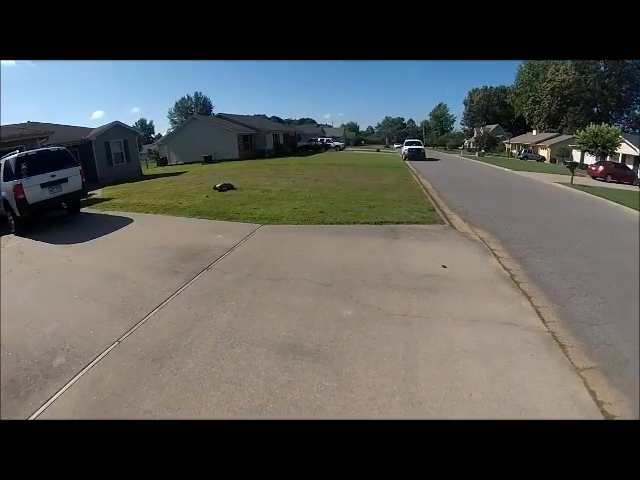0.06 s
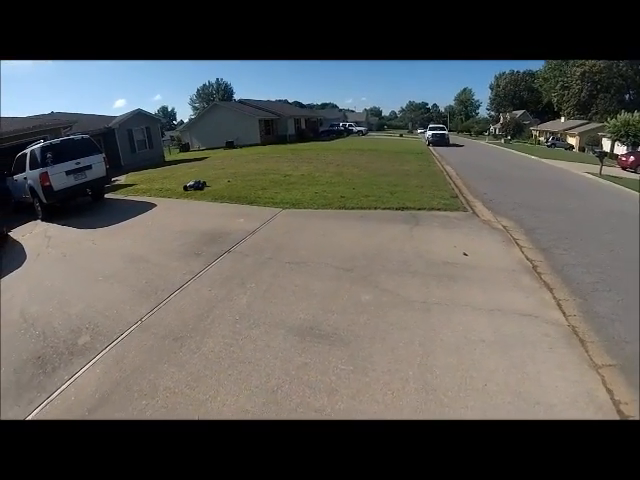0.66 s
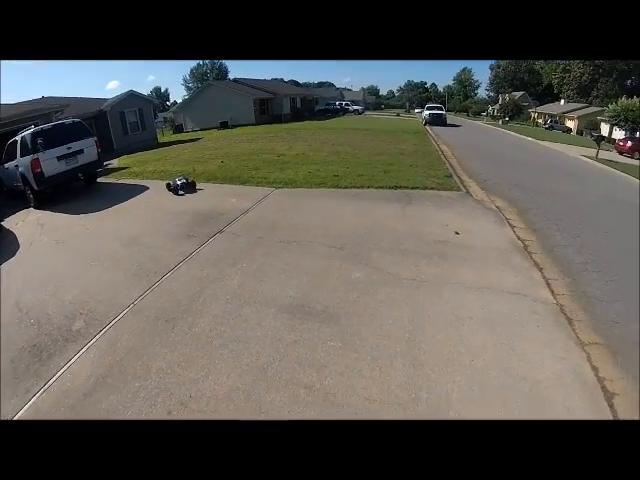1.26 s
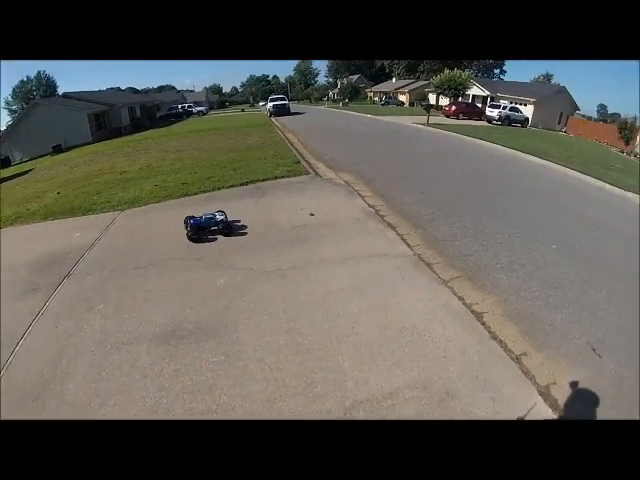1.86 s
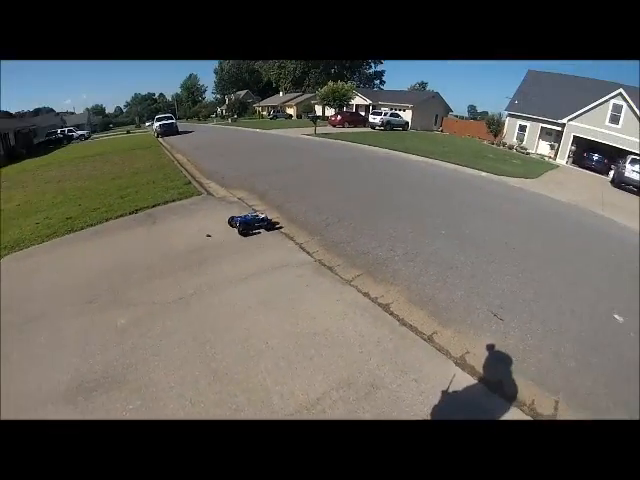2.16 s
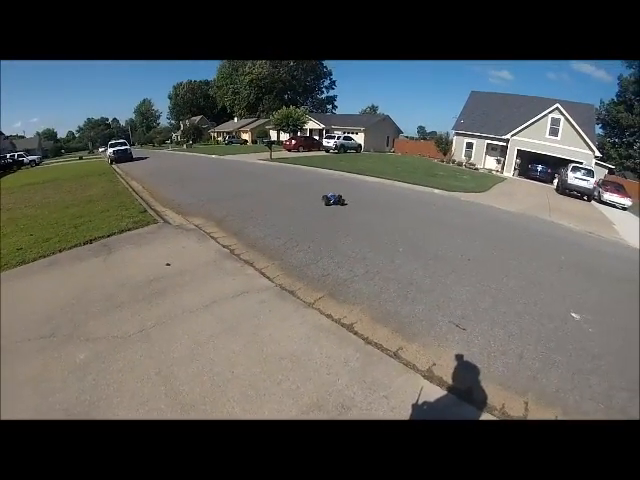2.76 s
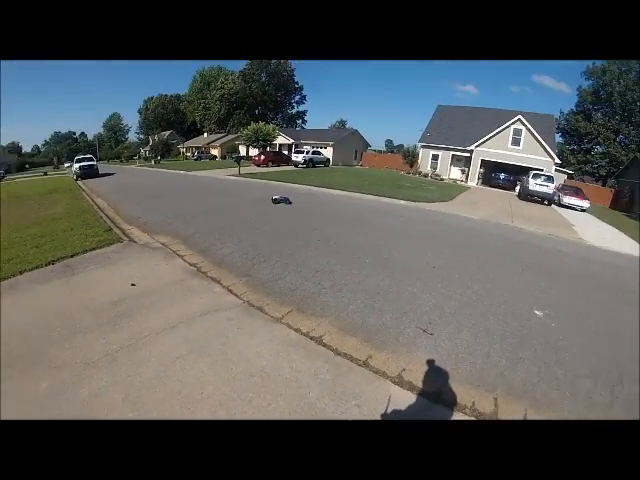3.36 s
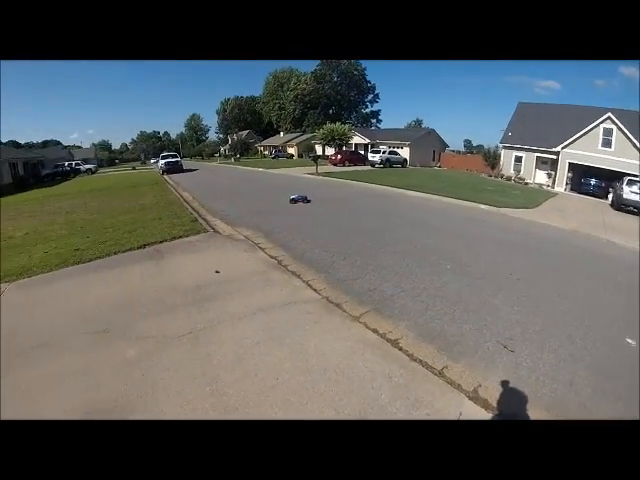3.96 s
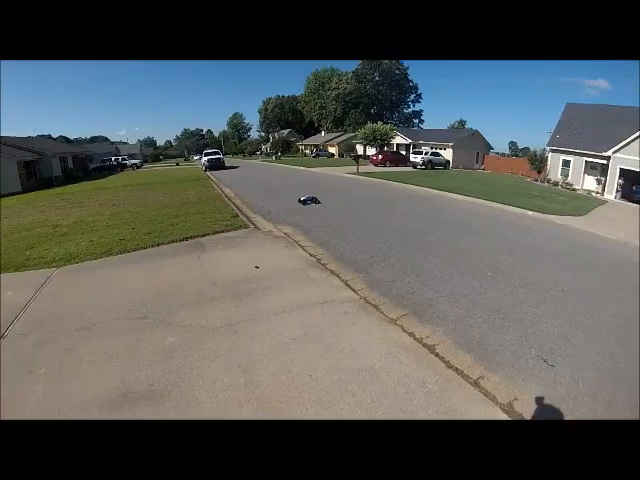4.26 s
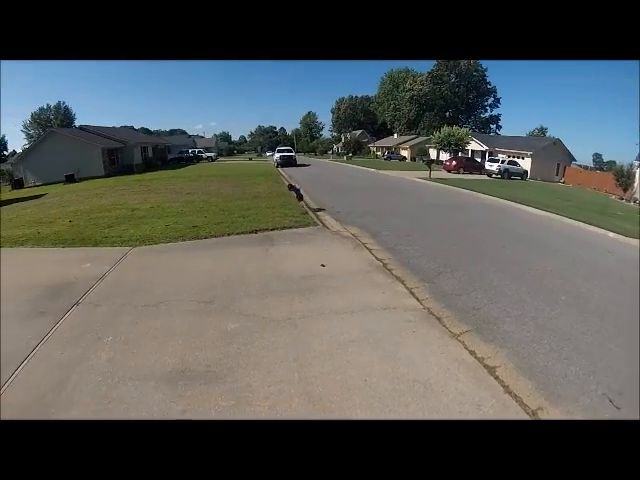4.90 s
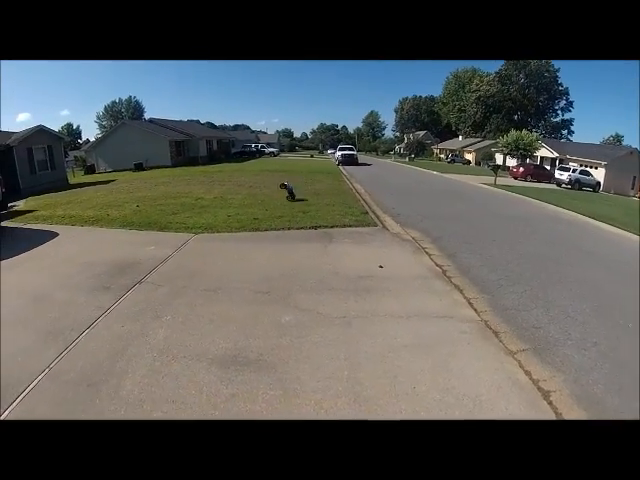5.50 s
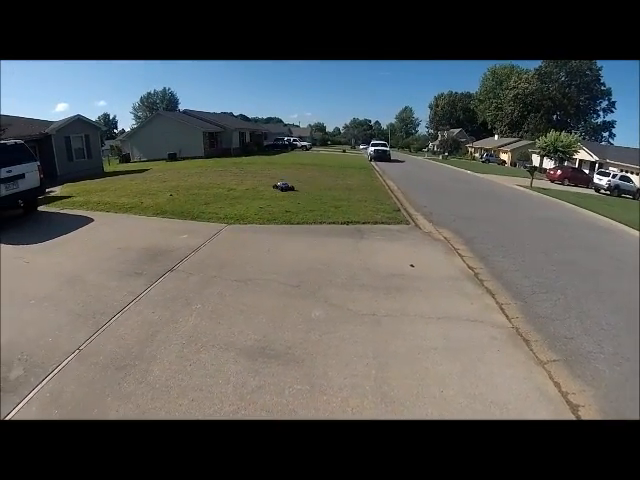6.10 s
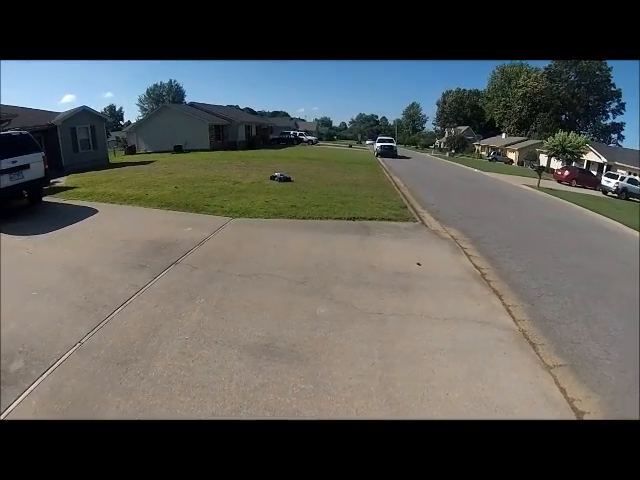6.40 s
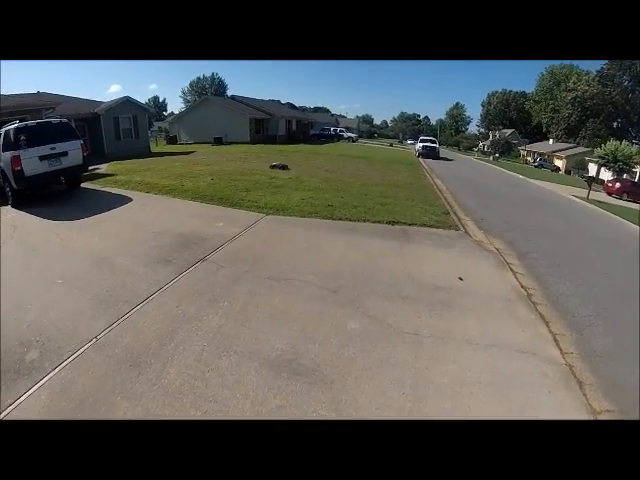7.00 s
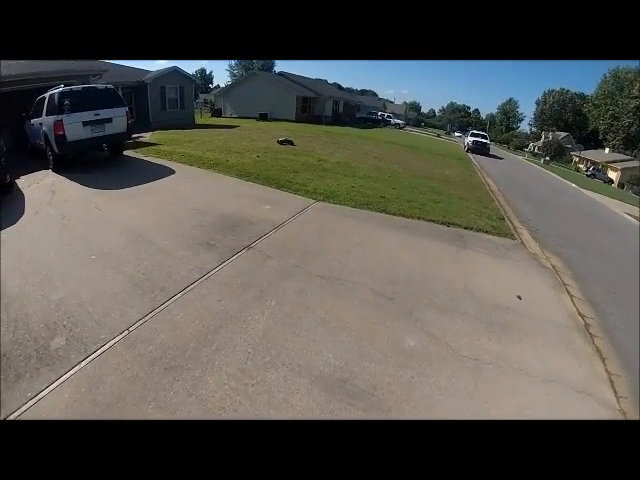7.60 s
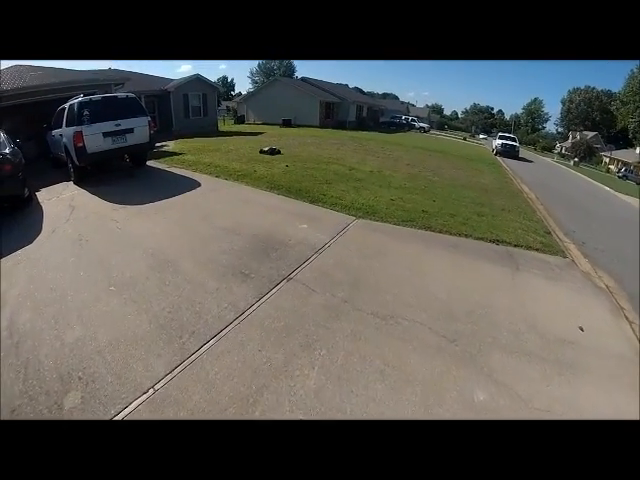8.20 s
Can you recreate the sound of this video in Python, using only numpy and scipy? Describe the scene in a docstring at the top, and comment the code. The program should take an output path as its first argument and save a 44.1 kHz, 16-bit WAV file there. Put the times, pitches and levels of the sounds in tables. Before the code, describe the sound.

Wind rumbles on the microphone as a toy truck's gears whine by, its tyres rush, and it knocks, tumbles and drives on.

```python
"""Wind buffets the microphone on a quiet suburban street while an electric toy truck whines off a lawn,
ten metres away. It speeds over concrete, passes at just over three metres, turns in the street, hits the
kerb, flies, tumbles and labours on through grass, out to seventeen metres. Its meshing gears sing
through the plastic shell, its tyres rush and drum, and the house fronts return a faint echo."""
import sys
import numpy as np
from scipy import signal
from scipy.fft import rfft, irfft, next_fast_len
from scipy.io import wavfile
from scipy.ndimage import uniform_filter1d, map_coordinates

SR = 44100
rng = np.random.default_rng(int(sys.argv[2]) if len(sys.argv) > 2 else 0)


def wrap_up_sound(samples):
    """Save the sound to the file named by the first command line argument, as 16-bit audio."""
    columns = np.atleast_2d(samples).T
    # keep every value between -1 and 1, then stretch to whole-number steps
    tamed = np.clip(columns, -1, 1)
    steps = np.round(tamed * 32767).astype(np.int16)
    wavfile.write(sys.argv[1], SR, steps)


N = 363825
TOP_HZ = 15000

# Loose shafts and shell, shaken by throttle or blows. Each row: frequency in Hz, density in dB.
LOOSE_PARTS = [(590, -24), (1000, -1), (1350, 4), (1860, -9), (2300, -1.5), (2700, -2), (3350, -6),
               (3870, -10.5), (4500, -8), (5000, -12), (5600, -1), (6500, -8.5), (7380, -15), (8100, -14.5),
               (8800, -26), (11300, -20), (12700, -21), (14000, -60)]
# Under the wheels. Each gives rolling, drumming and grit in dB, then depth of turf from 0 to 1.
LAWN = (-52, -82, -65, 1)
CONCRETE = (-41, -44.5, -54.5, 0)
ASPHALT = (-47.5, -50, -76.5, 0.5)
AIR = (-50.5, -79, -79, 0)


def amp(db):
    """Decibels to gain."""
    return 10 ** (np.asarray(db) / 20)


def unit(x):
    """Scale to rms 1."""
    return x / np.sqrt(np.mean(x ** 2) + 1e-20)


def wobble(rate):
    """A smooth random curve, rate knots a second."""
    knots = rng.standard_normal(int(N * rate / SR) + 4)
    return map_coordinates(knots, [np.arange(N) * rate / SR])


def filtered(x, response):
    """x through a complex response of frequency."""
    size = next_fast_len(N + SR // 2)
    return irfft(rfft(x, size) * response(np.fft.rfftfreq(size, 1 / SR)), size)[:N]


def coloured(x, spectrum):
    """x through (Hz, dB) points joined on a log frequency axis."""
    points_hz, db = np.transpose(spectrum)
    return filtered(x, lambda hz: amp(np.interp(np.log(hz + 1), np.log(points_hz + 1), db)))


def noise(spectrum):
    """Coloured noise of rms 1."""
    return unit(coloured(rng.standard_normal(N), spectrum))


def envelope(start, length, attack, release):
    """Rises, holds and dies away; times in seconds."""
    t = np.maximum(np.arange(N) / SR - start, 0)
    return (1 - np.exp(-t / attack)) * np.exp(-np.maximum(t - length, 0) / release)


def swells(rows, rise_share, release_s):
    """One gain curve for each dB column of (start, length, dB, ..) events; their powers add."""
    power = sum(np.outer(amp(dbs), envelope(start, length, rise_share * length, release_s)) ** 2
                for start, length, *dbs in rows)
    return np.sqrt(power)


def street(level_db=-66):
    """Distant traffic lays a steady bed under the suburb."""
    # Each row: frequency in Hz, density in dB.
    traffic = [(59, -14), (100, 2), (149, -10), (222, -6.5), (556, -15), (1020, -12), (1370, -23),
               (1760, -23), (2360, -30), (3510, -27.5), (3900, -34.5), (5680, -27.5), (7300, -35),
               (12100, -41.5), (14900, -62)]
    return amp(level_db) * noise(traffic)


def wind(breeze_db=-64.5):
    """Slow eddies push on the microphone; faster air roars round its housing."""
    # Each row: start in seconds, length in seconds, buffeting in dB, roar in dB.
    gusts = [(0, 0.18, -44.5, -45), (1.04, 0.93, -39.5, -42), (.19, .67, -37, -38), (.49, 0.14, -37, -37),
             (.9, 0.16, -33, -38.5), (1.77, 0.25, -39, -67), (1.98, 0.22, -46, -57),
             (2.28, 0.12, -50.5, -77), (3.45, 0.45, -49.5, -81), (4.5, 0.39, -54, -73),
             (4.91, 0.22, -43.5, -63.5), (5.2, 0.12, -40, -60), (5.35, 0.29, -53, -92),
             (5.7, 0.13, -45, -54), (5.86, 0.1, -38.5, -57), (6.08, 0.059, -48.5, -67),
             (6.21, 0.1, -44.5, -62), (6.35, 0.24, -56, -66.5), (7.31, 0.075, -54, -83),
             (7.792, 0.026, -37.5, -55.5), (7.95, 0.073, -38, -56.5), (8.05, 0.17, -45.5, -58)]
    # The eddies. Each row: frequency in Hz, density in dB.
    rumble_spectrum = [(11, -49), (18, 4.5), (46, -2), (140, -11), (350, -31), (460, -40), (770, -120)]
    # Air round the housing. Each row: frequency in Hz, density in dB.
    roar_spectrum = [(60, -3), (120, -2.5), (200, 0), (300, -1), (400, -5.5), (550, -11), (800, -16.5),
                     (1050, -24.5), (1400, -34), (3000, -53), (6000, -120)]
    buffet, flow = swells(gusts, rise_share=0.014, release_s=0.042)
    rumble = unit(noise(rumble_spectrum) * amp(3 * wobble(30)))
    roar = unit(noise(roar_spectrum) * amp(1.2 * wobble(60)))
    return np.hypot(buffet, amp(breeze_db)) * rumble + flow * roar


def house_echo(x, level_db=-17, t60=0.25, delay_s=0.024):
    """House fronts scatter a faint, late echo back to the microphone."""
    t = np.arange(SR // 2) / SR
    tail = rng.standard_normal(len(t)) * amp(-60 * t / t60) * (t > delay_s)
    return amp(level_db) * signal.fftconvolve(x, tail / np.linalg.norm(tail))[:N]


def controller(switch_hz=8113):
    """Chopped motor current makes the windings whistle faintly."""
    # Spells at part throttle. Each row: start in seconds, end in seconds, level in dB.
    spells = [(6.27, 6.66, -88), (6.76, 6.9, -94), (7.57, 7.9, -87), (7.9, 8.25, -91)]
    t = np.arange(N) / SR
    gate = sum(amp(db) * ((t > start) & (t < end)) for start, end, db in spells)
    whistle = unit(amp(2.7 * wobble(80)) * np.sin(2 * np.pi * switch_hz * t))
    return uniform_filter1d(gate, size=1800) * whistle


def knocks(contact_s=0.002, thud_db=-7, clack_db=-9, thud_t60=0.063, clack_t60=0.059):
    """Each blow on a joint, kerb or turf shakes the chassis and makes the loose shell clatter."""
    # Each row: start in seconds, level in dB, thud offset in dB, clack offset in dB.
    blows = [(0.56, -35, 3, -32), (0.807, -40, 2, -25), (0.95, -43, -7, -28), (1.276, -42, -14, -2),
             (1.937, -24.5, -2, -11), (1.963, -33, 3, -27), (2.016, -31.5, -4.5, -7), (2.303, -37, -2, -24),
             (2.333, -51, -12, -5), (2.358, -48, -12, -5), (2.44, -52, -7, -10), (3.062, -43, 0, -25),
             (3.103, -43, 2, -25), (4.919, -32, -2, -14), (4.94, -41, -8, -24), (4.973, -35, -5, -22),
             (4.994, -31.5, -1, -5), (5.049, -42, -17, -1.5), (5.086, -44.5, -20, 2),
             (5.131, -44.5, -23, -1), (5.157, -43, -26, 0.5), (5.244, -46, -16, -2), (5.28, -45, -23, 0),
             (5.349, -48, -20, -3), (5.378, -47, -6, -1), (5.412, -48.5, -16, -2.5),
             (5.517, -49.5, -18, -1.5), (5.645, -51, -20, 0), (5.686, -47, -1, 0), (5.702, -35, -1, -9),
             (5.724, -43.5, 3, -10), (5.759, -51, -6, -0.5), (7.02, -49, 1, -1), (7.167, -50.5, -13, -2),
             (7.318, -53, -4, -8), (7.595, -49.5, -8, -5.5), (7.63, -55.5, -10, 0)]
    # Chassis resonances. Each row: frequency in Hz, width in Hz, gain in dB.
    modes = [(628, 82, 10.5), (1110, 390, 0.5), (1556, 4.5, 8)]

    def chassis(hz):
        """The resonances add with alternating signs."""
        return sum((-1) ** k * amp(db) * 1j * hz * width / (centre ** 2 - hz ** 2 + 1j * hz * width)
                   for k, (centre, width, db) in enumerate(modes))

    t = np.arange(SR // 3) / SR
    thud_gain, clack_gain = np.zeros((2, N + SR))
    give = 1 - np.exp(-t / contact_s)  # rubber and turf yield
    for start, db, thud_offset, clack_offset in blows:
        first = round(start * SR)
        thud_gain[first:first + len(t)] += give * amp(db + thud_offset - 60 * t / thud_t60)
        clack_gain[first:first + len(t)] += give * amp(db + clack_offset - 60 * t / clack_t60)
    thud = thud_gain[:N] * unit(filtered(rng.standard_normal(N), chassis))
    clack = clack_gain[:N] * noise(LOOSE_PARTS)
    return amp(thud_db) * thud + amp(clack_db) * clack


def ground(crossing_s=0.2):
    """The wheels cross from surface to surface: curves of rolling, drumming and grit dB, and turf."""
    # Each row: time of crossing in seconds, surface.
    route = [(0, LAWN), (1.22, CONCRETE), (2.05, ASPHALT), (5.03, AIR), (5.7, LAWN)]
    t = np.arange(N) / SR
    under = np.outer(route[0][1], np.ones(N))
    for (_, old), (when, new) in zip(route, route[1:]):
        crossed = np.clip((t - when) / crossing_s + .5, 0, 1)
        under += np.outer(np.subtract(new, old), crossed)
    return under


def tyres(ground_db, octaves, spin):
    """Treads patter, drum on the hollow tyres and throw grit: more with speed, skids and wheelspin."""
    # Each row: start and length in seconds, then rolling, drumming and grit in dB.
    skids = [(1.55, 0.2, -35.5, -36.5, -74), (1.76, 0.14, -31.5, -60, -36.5), (2.56, 0.62, -42, -34.5, -84),
             (3.1, 0.53, -39.5, -37.5, -81), (3.46, 0.41, -51, -67, -57.5), (4.13, 0.27, -47.5, -46.5, -87),
             (6.42, 0.15, -45.5, -73, -73), (4.79, 0.2, -45, -61, -53), (4.9, 0.081, -29.5, -33.5, -67)]
    # Tread blocks on the ground. Each row: frequency in Hz, density in dB.
    tread = [(180, -27), (300, -8.5), (716, 0), (775, -1), (1010, -0.5), (1180, -9), (1750, -5),
             (2300, -20), (2700, -14.5), (3400, -15.5), (3900, -24.5), (4500, -20.5), (5670, -27.5),
             (7000, -34), (9100, -59), (15400, -120)]
    # The hollow tyres. Each row: frequency in Hz, density in dB.
    carcass = [(71, -46), (120, -22), (193, -5), (236, -4.5), (270, -2.5), (360, 1.5), (725, -8.5),
               (873, -11.5), (1160, -19), (1400, -44), (1820, -50), (3080, -120)]
    # Flying grit. Each row: frequency in Hz, density in dB.
    spray = [(4120, -9), (6000, -1), (6800, -18), (8000, -12), (8800, -8.5), (9800, -2.5), (10400, -6),
             (11200, -5), (12200, -11), (14900, -32)]
    roll_db, drum_db, grit_db = ground_db
    skid_roll, skid_drum, skid_grit = swells(skids, rise_share=0.063, release_s=0.032)
    roll_gain = amp(-1.5) * np.hypot(amp(roll_db + 4 * octaves + 6 * spin), skid_roll)
    drum_gain = np.hypot(amp(drum_db + 4 * octaves), skid_drum)
    grit_gain = amp(-2) * np.hypot(amp(grit_db + 8 * octaves + 9 * spin), skid_grit)
    bumps = amp(1.5 * wobble(70))
    roll = roll_gain * unit(bumps * noise(tread))
    drum = drum_gain * unit(bumps * noise(carcass))
    grains = amp(2 * wobble(790))
    grit = grit_gain * unit(bumps * grains * noise(spray))
    return roll + drum + grit


def coasting(octaves, pull, turf, level_db=-57):
    """Slack gears clatter in the hollow shell: most when rolling fast and unloaded on hard ground."""
    # The shell's ring. Each row: frequency in Hz, density in dB.
    hollow_shell = [(1000, -20), (1700, -3), (2350, -14), (2720, 0), (3050, -5), (3420, 3), (3880, -13),
                    (4450, -3), (4950, -6), (5500, 0), (5900, -5), (6400, -19), (8400, -21), (9900, -9),
                    (10700, -13), (11300, -12), (13500, -36)]
    clatter = amp(2.8 * wobble(110) + 2.2 * wobble(500))
    gain = amp(level_db + 4 * octaves - 3 * pull - 4 * turf)
    return gain * unit(clatter * noise(hollow_shell))


def rattle(gain, trim_db=-1):
    """Loose shafts and the shell buzz under throttle."""
    shake = amp(2.6 * wobble(240) + 1.3 * wobble(45))
    return amp(trim_db) * gain * unit(shake * noise(LOOSE_PARTS))


def motor(idle_hz=1300, attack_s=.005, release_s=.018, rattle_release_s=0.13):
    """Each squeeze of the throttle ramps the speed and loads the gears, then the truck coasts down."""
    # Each row: start and end in seconds, pinion mesh from and to in Hz, run-down time constant in
    # seconds, final whine in dB, swell in dB, rattle in dB, roughness, and the strain that brings out
    # the overtones in dB per multiple of the mesh.
    squeezes = [ (0, .55, 2030, 1960, 1.9, -60, -1, -56, 1.6, 6),
                (.55, 1.12, 1790, 2000, 1.9, -47, 3, -54, .9, 1.3),
                (1.125, 1.235, 1990, 1930, 1.9, -40.5, 3, -51, 1.1, -1.5),
                (1.24, 1.33, 2200, 2420, 1.9, -45.5, 0, -49, 1.1, 1),
                (1.335, 1.49, 2600, 3480, .9, -44.5, -3, -46, 1, 1.5),
                (1.49, 1.655, 3500, 4220, .9, -45, 1, -45, 1.1, .5),
                (1.655, 1.74, 4280, 4780, .9, -42, -1, -46, .6, -.5),
                (1.74, 1.83, 4780, 5150, .9, -41, 1, -44, .9, 1.5),
                (1.83, 1.895, 5400, 5750, .9, -40.5, 0, -44, 1.3, 0),
                (1.895, 1.96, 5750, 5200, .9, -50, -7, -47, 1.5, 1),
                (3.21, 3.3, 1660, 1750, 1.5, -52.5, 0, -53, 1.2, 4),
                (3.3, 3.38, 2100, 2300, 1.5, -51, 0, -52, 1.6, 4),
                (3.38, 3.55, 2330, 2600, 1.1, -47, 2, -49.5, 2.2, -1.5),
                (3.55, 3.74, 2500, 2200, .9, -50, -4, -52, 1.7, .5),
                (3.77, 4, 1720, 2020, .9, -56, -3, -54, 1.7, 1.5),
                (4.39, 4.55, 1800, 1880, 1.5, -54.5, 3, -52, 1.3, 4.5),
                (4.55, 4.62, 1930, 2020, 1.5, -49, 1, -51, 1, 4),
                (4.62, 4.7, 2060, 2200, 1.5, -45, 2, -50, .9, 2),
                (4.7, 4.78, 2220, 2420, 1.5, -43.5, 0, -49, 1, -.5),
                (4.78, 4.9, 2470, 2620, 1.5, -42.5, 0, -47, 1.8, -2),
                (4.901, 4.965, 3100, 4000, .1, -41, 0, -43, 1.4, 0),
                (4.995, 5.02, 2820, 3020, .5, -40, 0, -46, .8, -1),
                (5.051, 5.6, 2900, 2600, .9, -71, -17.5, -54, 1.75, -3),
                (5.083, 5.093, 4450, 4205, 1.96, -41.5, -2, -50, 1.4, -8),
                (5.151, 5.18, 4300, 2806, 3, -47, -5, -50, 1.8, -7),
                (5.28, 5.3, 3000, 2500, .6, -50, -2, -54, 1.8, -4),
                (5.378, 5.42, 3100, 2600, .6, -52, -2, -55, 1.8, -4),
                (5.516, 5.53, 2700, 2500, .6, -52, -2, -58, 1.8, -4),
                (6.286, 6.32, 3400, 2800, .3, -52, 0, -55, 2.4, 1),
                (6.32, 6.36, 2850, 3400, .3, -49, 2, -54, 2.2, 1),
                (6.39, 6.425, 3050, 3200, .3, -50, 0, -54, 2.4, 0),
                (6.435, 6.465, 2800, 2550, .5, -46, 2, -53, 2, 0),
                (6.485, 6.512, 2650, 2750, .3, -43, 2, -53, 1.8, -1),
                (6.535, 6.555, 2750, 2600, .4, -44, -2, -53, 1.8, -1),
                (6.572, 6.605, 2650, 2950, .3, -46, -2, -52, 2.1, -.5),
                (6.635, 6.68, 3300, 2650, .3, -53.5, -3, -58, 2.2, 3),
                (6.79, 6.815, 1680, 1930, .5, -51, 5, -60, .7, 6),
                (6.825, 6.92, 2050, 2260, .5, -52, 1, -58, 1.5, 4.5),
                (6.93, 7, 2600, 2950, .13, -45, 0, -54, 1, 2),
                (7.028, 7.065, 2660, 2780, .4, -44, 2, -53, 1.3, 2),
                (7.083, 7.1, 3300, 3100, .15, -47, 0, -54, 1.8, 3),
                (7.66, 7.79, 1300, 1870, 1, -50.5, 3, -54, 1.6, 5),
                (7.79, 7.857, 1870, 1740, .4, -52.5, -1, -54, 1.8, 5),
                (7.857, 7.945, 2020, 1930, .6, -49, -2, -57, .9, 5.5),
                (7.96, 8.03, 2020, 1900, .5, -55, -1, -59, 1.3, 5.5),
                (8.1, 8.25, 1980, 1820, 1.9, -56, -2, -60, 1.5, 5)]
    t = np.arange(N) / SR
    mesh_hz, rough, strain_db, pull, whine_gain, rattle_gain = np.zeros((6, N))
    for start, end, from_hz, to_hz, run_down, whine_db, swell_db, rattle_db, roughness, strain in squeezes:
        done = np.clip((t - start) / (end - start), 0, 1)
        slowing = np.exp(-np.maximum(t - end, 0) / run_down)
        ramp_hz = (from_hz + (to_hz - from_hz) * done) * slowing
        since = t >= start
        mesh_hz[since], rough[since], strain_db[since] = ramp_hz[since], roughness, strain
        shaken = envelope(start, end - start, attack_s, rattle_release_s)
        load = envelope(start, end - start, attack_s, release_s)  # teeth take up and shed the load
        pull = np.maximum(pull, load)
        whine_gain = np.maximum(whine_gain, load * amp(whine_db + swell_db * (done - 1)))
        rattle_gain = np.maximum(rattle_gain, shaken * amp(rattle_db + swell_db * (done - 1) / 2))
    return np.maximum(mesh_hz, idle_hz), rough, strain_db, pull, whine_gain, rattle_gain


def gears(mesh_hz, rough, strain_db, turf, pinion_teeth=11, bounce=.014, tuft_drag=.022, play=.015):
    """Three stages of meshing teeth sing through the shell, rasping at the shaft's rate."""
    # The stages and their overtones. Each row: multiple of the pinion mesh, level in dB.
    partials = [(.382, -5), (.545, -6), (.765, -4.5), (1, 0), (1.09, -12), (2, -4.5), (2.19, -14),
                (2.73, -18), (3, -12.5), (4, -25)]
    # The plastic body. Each row: frequency in Hz, gain in dB.
    shell = [(500, -12), (950, -3), (1300, -1), (1450, -2), (1650, 4.5), (1950, 0), (2250, -4), (2650, 0),
             (3000, -1), (3380, 5), (3600, -2), (3870, -11), (4450, 0), (5000, -2), (5500, 6), (6100, 3),
             (6600, -3), (7150, -2), (7600, -7), (8200, -2), (9000, -2), (9800, 5), (10350, -5),
             (11200, -2), (12500, -12), (14000, -30)]
    # Turf swallows the mids while the strained gearbox rings. Each row: frequency in Hz, gain in dB.
    grass = [(1000, -3), (1600, -1), (1950, 0), (2700, 0), (3100, -4), (3500, -6), (4200, -5), (5000, 1),
             (5600, 3), (6300, 3), (8000, 2), (10000, -9), (11500, -2)]
    labouring = np.clip(turf, 0, 1)
    # Bumps and tufts tug at the speed and break up the whole whine.
    speed_hz = mesh_hz * (1 + bounce * rough * wobble(70) + tuft_drag * labouring * wobble(34))
    stutter = unit(amp(2 * wobble(60) + 3 * labouring * wobble(28)))
    shaft_angle = 2 * np.pi * np.cumsum(speed_hz) / SR / pinion_teeth
    slack = rough * (1 - labouring / 2)  # the drag of grass keeps the teeth pressed together
    whine = np.zeros(N)
    for multiple, db in partials:
        hz = multiple * speed_hz * (1 + play * slack * wobble(600))  # play in the teeth blurs each line
        # The off-centre pinion swings the phase once a turn.
        swing = .33 * slack * min(multiple, 2) * np.sin(shaft_angle + wobble(40))
        flutter = amp(2.8 * wobble(190) + 1.8 * wobble(30))  # tooth pressure and ground bounce vary
        tone = unit(flutter * np.sin(2 * np.pi * np.cumsum(hz) / SR + swing))
        whine += amp(db + max(multiple - 1, 0) * strain_db) * (hz < TOP_HZ) * tone
    ring = coloured(whine, shell)
    return stutter * ((1 - labouring) * ring + labouring * coloured(ring, grass))


def scene(cruise_hz=2090):
    """One microphone between the houses; gearbox and tyres fade with the truck's distance."""
    # The truck's path. Each row: time in seconds, distance from the microphone in metres.
    path = [(0, 10.2), (1, 10), (1.5, 6.4), (1.87, 4.76), (2.1, 3.37), (2.5, 3.85), (3.1, 7.03), (4.2, 8.7),
            (4.9, 9.5), (5.7, 9.9), (7, 17), (8.25, 17)]
    metres = np.interp(np.arange(N) / SR, *np.transpose(path))
    mesh_hz, rough, strain_db, pull, whine_gain, rattle_gain = motor()
    *ground_db, turf = ground()
    octaves = np.log2(mesh_hz / cruise_hz)  # speed above an easy pace
    jolts = unit(amp(0.06 * wobble(170)))  # faintly shake the whole gearbox at once
    whine = whine_gain * gears(mesh_hz, rough, strain_db, turf)
    gearbox = jolts * (whine + rattle(rattle_gain) + coasting(octaves, pull, turf))
    wheels = tyres(ground_db, octaves, spin=turf * pull)
    truck = (gearbox + wheels) / metres + knocks() + controller()
    return (truck + house_echo(truck) + wind() + street())[None]


def record(dry):
    """The camera's mono microphone channel keeps nothing above its band limit."""
    return filtered(dry[0], lambda hz: hz < TOP_HZ)[None]


dry = scene()
out = record(dry)
wrap_up_sound(out)
```